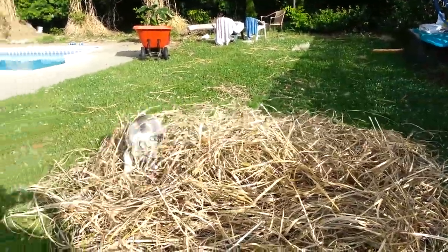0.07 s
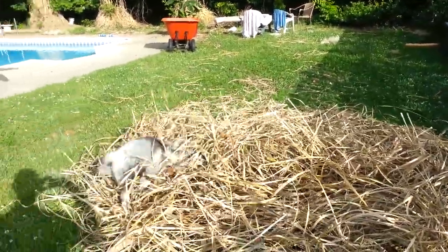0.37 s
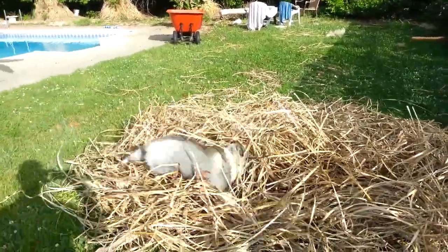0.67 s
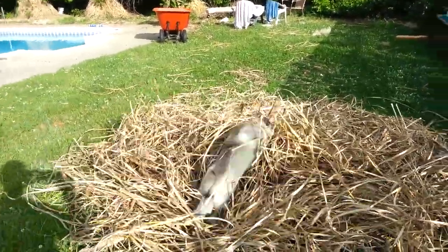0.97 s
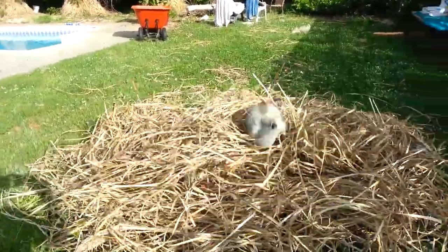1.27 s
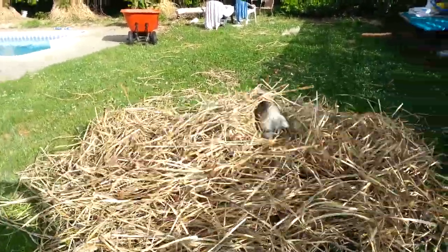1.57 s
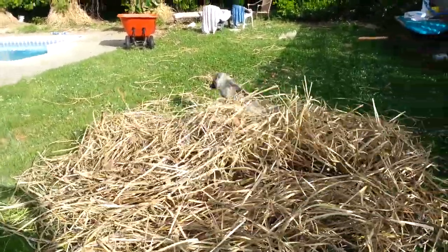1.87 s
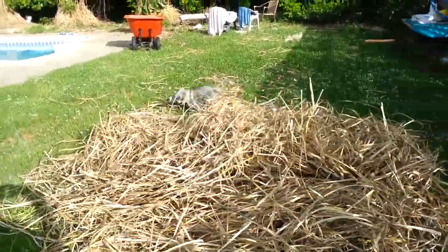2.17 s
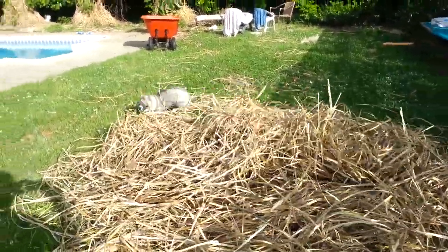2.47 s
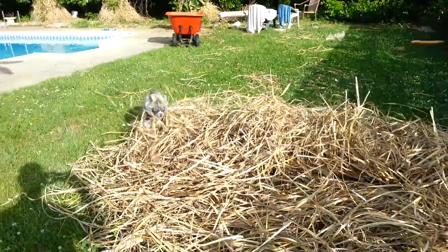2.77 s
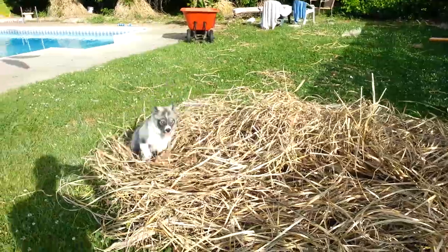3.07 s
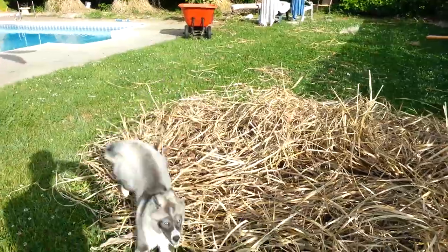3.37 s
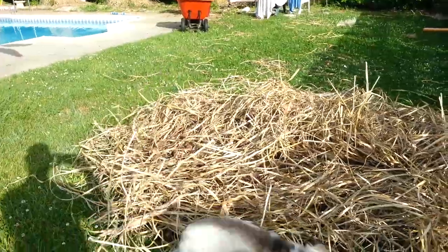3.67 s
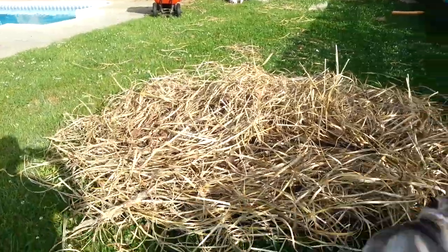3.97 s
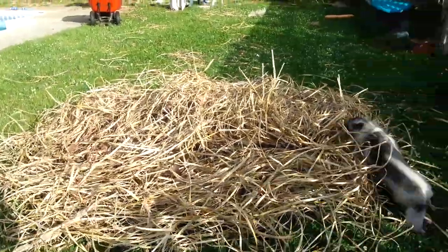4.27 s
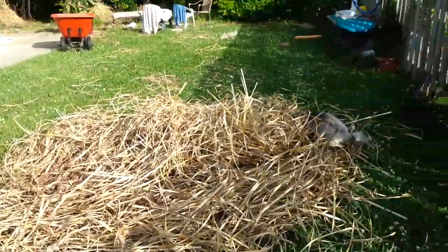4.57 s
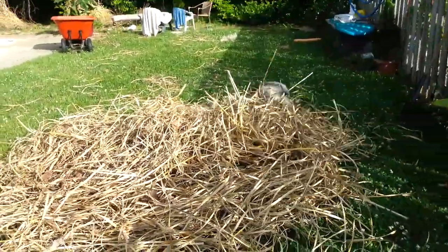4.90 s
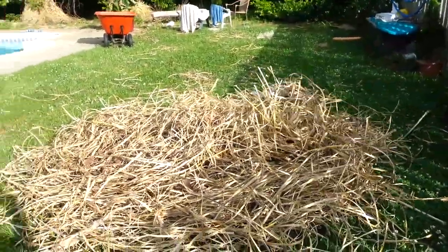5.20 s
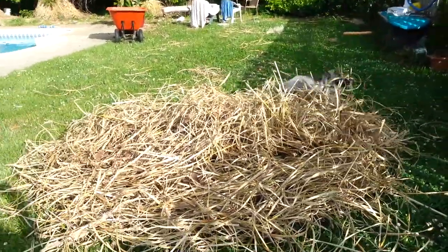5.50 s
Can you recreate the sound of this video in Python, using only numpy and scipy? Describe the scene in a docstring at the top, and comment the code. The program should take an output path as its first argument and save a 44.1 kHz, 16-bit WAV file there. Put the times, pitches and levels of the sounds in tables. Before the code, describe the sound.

A puppy races through a heap of dry straw on a lawn, one to four metres from a stereo microphone. The stalks rustle and swish in quick surges, and a few snap. The rustling turns lighter midway, with soft paw thuds and a few tiny metallic tinks as the puppy circles close, then swells again as it dives back in. A faint pump and fan hum continues underneath.

```python
"""Dry straw rustles a few metres from a stereo microphone on a lawn: a puppy bounds through the heap,
circles close past and dives in again. Stalks slide and buckle under each bound and a few snap; paws thud
softly on the turf and a small piece of metal, likely the collar tag, tinks. From across the garden
a pool pump and a fan hum throughout, over a low garden rush and a faint, straw-like high hiss."""
import sys
import numpy as np
from scipy import signal
from scipy.fft import rfft, irfft, next_fast_len
from scipy.io import wavfile
from scipy.ndimage import uniform_filter1d

SR = 44100
rng = np.random.default_rng(int(sys.argv[2]) if len(sys.argv) > 2 else 0)


def file_out(sig):
    """Save sig as 16-bit WAV at sys.argv[1]."""
    # one column per channel
    cols = np.atleast_2d(sig).T
    # limit, then scale
    lim = np.clip(cols, -1, 1)
    pcm = np.round(lim * 32767).astype(np.int16)
    wavfile.write(sys.argv[1], SR, pcm)


N = 248724
TIME = np.arange(N) / SR


def gain_of(db):
    """Decibels to amplitude."""
    return 10 ** (np.asarray(db) / 20)


def unit_rms(x):
    """Scales to rms 1."""
    return x / np.sqrt(np.mean(x ** 2) + 1e-20)


def spectrum_at(points, hz):
    """Reads a spectrum table on a log-frequency axis."""
    f, value = np.transpose(points)
    return np.interp(np.log(hz + 1), np.log(f + 1), value)


def follow(rows, t, column=1):
    """One column of a curve table at times t."""
    rows = np.array(rows)
    return np.interp(t, rows[:, 0], rows[:, column])


def add(mix, s, sound):
    """Lays a stereo sound into the mix at time s."""
    part = mix[:, max(round(s * SR), 0):][:, :sound.shape[1]]
    part += sound[:, :part.shape[1]]


def filtered(x, gain):
    """Filters by a function from Hz to gain."""
    size = next_fast_len(x.shape[-1] + 2048)
    hz = np.fft.rfftfreq(size, 1 / SR) + 1e-3
    return irfft(rfft(x, size) * gain(hz), size)[..., :x.shape[-1]]


def drift(rate_hz):
    """A slow random wander of rms 1."""
    return unit_rms(filtered(rng.standard_normal(N), lambda hz: np.exp(-(hz / rate_hz) ** 2)))


# Likeness of the sound at the two microphones: f/Hz, correlation
MIC_CORRELATION = [(100, 0.52), (500, 0.7), (1200, 0.27), (2300, 0.66), (4500, 0.25), (8000, 0.17),
                   (12000, 0.096)]

def noise_pair():
    """White noise at two microphones, partly alike in the bass and nearly unrelated in the treble."""
    mid, side = rng.standard_normal((2, N))
    mid = filtered(mid, lambda hz: np.sqrt((1 + spectrum_at(MIC_CORRELATION, hz)) / 2))
    side = filtered(side, lambda hz: np.sqrt((1 - spectrum_at(MIC_CORRELATION, hz)) / 2))
    return np.array([mid + side, mid - side])


# Bounds and steps into the straw, at their hardest push: t/s, level/dB, build-up/s, settling/s, hiss/dB
PUPPY_BOUNDS = [(.01, -32, .04, .04, 0.5), (.14, -28, 0.093, 0.21, 1), (.445, -26, 0.035, 0.055, 1),
                (.63, -30.5, 0.064, 0.053, 1), (.752, -26, 0.075, 0.038, 0), (.839, -29, 0.0043, 0.05, 0),
                (.91, -24.5, 0.095, 0.051, -2), (.955, -26, 0.018, 0.016, 0), (1.02, -30, .06, 0.14, -0.5),
                (1.21, -25, 0.094, 0.083, 0), (1.4, -27.5, 0.055, 0.03, -1), (1.485, -24, 0.095, 0.051, -3),
                (1.64, -24.5, 0.048, 0.098, -1.5), (1.82, -30.5, 0.063, 0.11, -3),
                (2.09, -30, 0.12, 0.12, -0.5), (2.27, -40, 0.025, 0.084, 3),
                (2.525, -35.5, 0.046, 0.079, 1), (2.645, -42.5, 0.022, .04, 6),
                (2.79, -34, 0.084, 0.095, 2), (2.93, -31, 0.097, 0.1, -0.5),
                (3.04, -30.5, 0.018, 0.044, 2.5), (3.095, -30.5, 0.04, 0.025, 2),
                (3.235, -32.5, 0.049, 0.069, 0.5), (3.45, -30, 0.043, 0.042, -1.5),
                (3.545, -33.5, 0.022, 0.027, -1), (3.6, -35.5, .025, 0.023, 2),
                (3.665, -33.5, 0.035, 0.049, -1.5), (3.795, -33, 0.031, 0.028, -1),
                (3.855, -32.5, 0.023, 0.013, 1), (3.905, -31.5, 0.016, 0.013, 3),
                (3.99, -36.5, 0.064, 0.045, 0), (4.073, -36, 0.0084, 0.022, -3),
                (4.155, -37.5, 0.034, 0.041, 1), (4.32, -34, 0.06, 0.044, 0), (4.4, -30.5, 0.045, 0.05, 0),
                (4.475, -29.5, 0.071, 0.069, 0.5), (4.65, -26.5, 0.081, 0.081, 0.5),
                (4.95, -30, 0.18, 0.21, 0), (5.149, -32, 0.021, 0.014, -3), (5.3, -45.5, .06, 0.056, 4),
                (5.485, -30, 0.055, 0.1, -0.5), (5.61, -29.5, 0.031, 0.043, -5)]

def bounds_db(t, with_hiss=False, creep_db=-52):
    """Each bound builds to its hardest push, then the straw settles, never quite coming to rest."""
    build_shape, settle_shape = 1.27, 1.36  # 1 = pointed, 2 = rounded
    power = gain_of(creep_db) ** 2
    for s, db, build_s, settle_s, hiss_db in PUPPY_BOUNDS:
        before = (np.maximum(s - t, 0) / build_s) ** build_shape
        after = (np.maximum(t - s, 0) / settle_s) ** settle_shape
        power = power + gain_of(db + with_hiss * hiss_db) ** 2 * np.exp(-before - after)
    return 10 * np.log10(power)


def rustle_db():
    """The rustle's level at every sample."""
    t = np.arange(0, N, 64) / SR
    return np.interp(TIME, t, bounds_db(t))


def crackle(per_s, spread_db, cycles, low_hz, high_hz, count):
    """Stalks buckle in tiny ticks; each stalk has its own pitch and place."""
    t, out = np.arange(512) / SR, np.zeros((2, N))
    for hz in np.geomspace(low_hz, high_hz, count):
        size = gain_of(spread_db * np.minimum(rng.exponential(1, N), 4)) * rng.choice([-1, 1], N)
        impulses = size * (rng.random(N) < per_s / count / SR)
        tick = np.sin(2 * np.pi * hz * t) * np.exp(-hz * t / cycles) * hz
        sound = signal.oaconvolve(impulses, tick)[:N]
        lag = rng.integers(-1, 2)
        out += [np.roll(sound, lag), np.roll(sound, -lag)]
    return unit_rms(out)


# Straw underfoot: t/s, share of loose straw by the microphone, share of right flank (the rest is mid-heap)
STRAW_SHARES = [(0, 0.04, 0.3), (2.4, 0.04, 0.17), (3.3, 0.16, 0.43), (3.42, 0.4, 0.2), (3.92, 0.83, 0),
                (4.03, 0.7, 0.5), (4.6, 0.1, 0.47), (5.2, 0, 0.63), (5.64, 0.11, 0.7)]

def stalk_contact(clump_db=0.55):
    """Stalks slide and buckle, thick hollow ones knock, and crisp ticks stand out near the microphone."""
    ticks = crackle(per_s=6000, spread_db=3, cycles=1.6, low_hz=2200, high_hz=13500, count=36)
    knocks = crackle(per_s=900, spread_db=1.5, cycles=6, low_hz=3000, high_hz=7000, count=24)
    crisp = crackle(per_s=900, spread_db=2.2, cycles=9, low_hz=8000, high_hz=12800, count=12)
    loose = follow(STRAW_SHARES, TIME)
    crackling = gain_of(-6) * ticks + gain_of(-14) * knocks + gain_of(-7) * loose * crisp
    return (noise_pair() + crackling) * gain_of(clump_db * drift(28))


# Rustle from mid-heap, from loose straw by the microphone and from the right flank: f/Hz, level/dB
HEAP_SPECTRUM = [(300, -26), (420, -14), (540, -9.5), (700, -7.5), (950, -8), (1350, -5.5), (1700, -4.5),
                 (2050, -3), (2450, -3), (2800, -6), (3200, -6), (3800, -1.8), (5300, 1), (6400, -3.5),
                 (7100, -2.5), (7700, -5.5), (8500, -4.5), (10500, -7.5), (12500, -6.5), (14500, -11)]
LOOSE_SPECTRUM = [(250, -25), (450, -16), (750, -5), (1180, -7), (1550, -4.5), (2300, -6.5), (3200, -4.5),
                  (4700, -1), (6500, -4), (7600, -3.5), (8800, -7), (10300, -3.5), (11900, -6), (13000, -8),
                  (14500, -10.5)]
FLANK_SPECTRUM = [(300, -28), (420, -17), (540, -7.5), (680, 0), (880, -7.5), (1150, 1.5), (1600, -4.5),
                  (2200, -3.5), (3000, -0.5), (4800, -2), (6800, -6), (8600, -0.5), (11000, -6.5),
                  (14500, -10)]
# Rings of the stalks and the heap's hollows: t/s, papery f/Hz, level/dB, hollow f/Hz, level/dB
STRAW_RINGS = [(0, 4400, 0.5, 2300, 0), (.45, 4620, 0, 2240, 1), (.92, 5700, 2, 2200, 3),
               (1.2, 5130, 1, 2150, 2.5), (1.47, 5130, 2, 2000, 4.5), (2.2, 4770, 3, 2450, -1),
               (2.6, 4370, 2.5, 2400, -1), (2.9, 4100, 0.5, 2020, 2.5), (3.25, 4500, 0.5, 2050, 3),
               (3.6, 5240, 1, 2200, 4), (4.1, 3900, 0.5, 2300, 0.5), (4.6, 5000, 0, 2080, -1.5),
               (5.05, 4830, 3.5, 1930, 2.5), (5.64, 5100, 0.5, 2200, 2.5)]

def straw_colour_db(hz, t, papery_width_hz=620, hollow_width_hz=160, patchy_db=1.1):
    """The colour shifts in patches and two rings move as the puppy meets other bundles of stalks."""
    loose, flank = follow(STRAW_SHARES, t), follow(STRAW_SHARES, t, column=2)
    places = [(HEAP_SPECTRUM, 1 - loose - flank), (LOOSE_SPECTRUM, loose), (FLANK_SPECTRUM, flank)]
    colour_db = sum(np.outer(spectrum_at(place, hz), share) for place, share in places)
    for column, width_hz in [(1, papery_width_hz), (3, hollow_width_hz)]:
        detuning = (hz[:, None] - follow(STRAW_RINGS, t, column)) / width_hz
        colour_db += follow(STRAW_RINGS, t, column + 1) / (1 + detuning ** 2)
    patches = uniform_filter1d(rng.standard_normal(colour_db.shape), size=4, axis=0)
    patches = unit_rms(uniform_filter1d(patches, size=30, axis=1))
    return colour_db + patchy_db * patches * (hz / (hz + 600))[:, None]


# Two early reflections close to the microphone: t/s, a silent delay/ms, then delay/ms of each of the two
REFLECTION_DELAYS = [(0, .91, 1.54, 1.94), (.68, .9, 1.5, 1.92), (.9, .8, 1.3, 2.08),
                     (1.35, .78, 1.54, 2.08), (2.05, .88, 1.63, 2.1), (2.55, .91, 1.68, 2.03),
                     (2.8, .9, 1.65, 1.93), (3.05, .9, 1.53, 1.9), (3.28, .91, 1.52, 1.9),
                     (3.45, .9, 1.25, 1.9), (4.05, .9, 1.14, 1.8), (4.65, .9, 1.53, 1.75),
                     (4.95, .89, 1.65, 2.05), (5.4, .9, 1.75, 2.2)]

def reflections_db(hz, t, depths_db=(1.5, 0.83), scatter_hz=4470):
    """Two early reflections ripple the rustle; the ripple glides with the puppy, fading in the treble."""
    ripple = sum(db * np.cos(2 * np.pi * np.outer(hz, follow(REFLECTION_DELAYS, t, column)) / 1000)
                 for column, db in enumerate(depths_db, start=2))
    return ripple / (1 + (hz[:, None] / scatter_hz) ** 4) * (1 - follow(STRAW_SHARES, t))


# The puppy's path over the lawn: t/s, lead at the left microphone/ms, distance/m
PUPPY_PATH = [(0, -0.067, 3.5), (.45, -0.072, 3), (.7, -0.0043, 1.7), (1.15, -0.026, 1.9), (1.4, 0.032, 2),
              (2.05, 0.02, 2.7), (2.65, -0.059, 3.4), (3.25, -0.078, 2.1), (3.55, -0.074, 1.06),
              (3.82, 0.055, 0.91), (4.05, 0.14, 2.2), (4.45, 0.1, 2.3), (5.1, 0.043, 4.4),
              (5.64, 0.11, 2.5)]
# Shading by the recorder's body: f/Hz, factor on the left-right level difference
BODY_SHADOW = [(1500, -0.26), (3100, 0.15), (4400, -1.5), (5300, 0.2), (6000, 0.2), (7000, 1.76), (8300, 1),
               (10000, 0.5), (11000, 1.1), (13000, 2.5), (14200, 2)]
# Balance as the puppy passes about a metre away: f/Hz, left minus right/dB
CLOSE_BALANCE = [(60, 2.5), (130, 1.0), (290, 1.0), (640, -1), (1410, -1), (3100, 5.5), (6820, -2.5),
                 (15000, -12)]

def direction(hz, t, ahead_db=-3, db_per_ms=29):
    """Left and right gains: the body shades one microphone, and sound reaches one before the other."""
    lead_ms, loose = follow(PUPPY_PATH, t), follow(STRAW_SHARES, t)
    side_db = np.outer(spectrum_at(BODY_SHADOW, hz), (ahead_db + db_per_ms * lead_ms) * (1 - loose))
    side_db += np.outer(spectrum_at(CLOSE_BALANCE, hz), loose)
    left = gain_of(side_db / 2) * np.exp(1j * np.pi * np.outer(hz, lead_ms) / 1000)
    return np.array([left, 1 / left])


def crunch_and_hiss_db(t, stride_s=0.35, tips_lead_s=0.0042, push_share=0.3):
    """Low crunch and tip hiss against the swish: both thin with distance, and each push is brighter."""
    doublings = np.log2(follow(PUPPY_PATH, t, column=2))  # of distance, from 1 m
    stride_db = np.mean([bounds_db(t + k * stride_s / 2) for k in (-1, 0, 1)], axis=0)
    push_db = bounds_db(t + tips_lead_s) - stride_db  # tips are brushed before the weight comes down
    bright_db = push_share * push_db + bounds_db(t, with_hiss=True) - bounds_db(t)
    return -9.5 - 0.5 * doublings, 2.5 - 3 * doublings + bright_db


def rustle(crunch_hz=1700, hiss_hz=7000):
    """Under the puppy's bounds the crushed heap crunches, the stalks swish and their tips hiss."""
    hz, t, frames = signal.stft(stalk_contact(), SR, nperseg=512, noverlap=384)
    frames = frames * gain_of(straw_colour_db(hz, t) + reflections_db(hz, t)) * direction(hz, t)
    crunch = 1 / (1 + (hz / crunch_hz) ** 6)
    hiss = 1 - 1 / (1 + (hz / hiss_hz) ** 8)
    swish = 1 - crunch - hiss
    crunch_db, hiss_db = crunch_and_hiss_db(t)
    # each band is evened out over time, then given its own level
    power = uniform_filter1d(abs(frames.mean(0)) ** 2, size=80, axis=1)
    weight = sum(np.outer(band, gain_of(db) / np.sqrt(abs(band @ power) + 1e-20))
                 for band, db in [(crunch, crunch_db), (swish, 0), (hiss, hiss_db)])
    frames = frames * weight / np.hypot(1, gain_of(hiss_db))
    straw = signal.istft(frames, SR, nperseg=512, noverlap=384)[1][:, :N]
    return straw / straw.mean(0).std() * gain_of(rustle_db())


# Steady background, a low garden rush and a faint, straw-like high hiss: f/Hz, level/dB
BACKGROUND_SPECTRUM = [(25, -39), (50, -33), (75, -15.5), (110, 0), (150, -7.5), (200, -2.5), (260, 1.5),
                       (400, 0.5), (560, -3), (900, -13), (2000, -13), (6000, -9), (14000, -31)]
# Pump and fan tones from across the garden: f/Hz, level/dB, waver/dB
HUM_TONES = [(120.1, -54.5, 1.5), (178.6, -69, 6.5), (239.6, -58.5, 4), (292.2, -46.5, 1.5),
             (352.7, -68.5, 5.5), (584.5, -56, 0)]
# Swell of all but the deepest tone: t/s, level/dB
TONE_SWELL = [(0, -0.5), (.75, -1), (.86, 6), (1, -0.5), (1.7, 1.5), (2.1, -1), (2.31, 2), (2.6, 1),
              (4.2, 0.5), (4.9, -1), (5.64, -1.5)]

def garden(background_db=-44.5, wobble_rad=0.24, hum_trim_db=0.1, hum_sink_db=3, background_sink_db=11):
    """Pump and fan tones waver on the way over the lawn, above a low rush and a faint high hiss."""
    noise = filtered(noise_pair(), lambda hz: gain_of(spectrum_at(BACKGROUND_SPECTRUM, hz)))
    background = gain_of(background_db) * unit_rms(noise)
    hum = np.zeros((2, N))
    for hz, db, waver_db in HUM_TONES:
        phase = 2 * np.pi * hz * TIME + wobble_rad * drift(17)
        swell_db = follow(TONE_SWELL, TIME) * (hz > HUM_TONES[0][0])
        level_db = db + hum_trim_db + swell_db + waver_db * drift(14)
        hum += np.sqrt(2) * gain_of(level_db) * np.sin([phase + 0.083, phase - .25])
    # both sink while the straw is loud
    loud = np.clip((rustle_db() + 32) / 6, 0, 1)
    return background * gain_of(-background_sink_db * loud) + hum * gain_of(-hum_sink_db * loud)


# Stalks breaking under the puppy: t/s, peak level/dB, left minus right/dB, pitch factor
STALK_SNAPS = [(.8305, -7, 0, .97), (.8320, -17, 2, 1), (.8457, -12.5, -1, 1.03), (.9014, -17, 0, .96),
               (.9274, -16.5, -1, .45), (.9494, -16.5, -1.5, 1.1), (1.4307, -16, -1, .95),
               (1.785, -19, -1, 1), (2.2729, -23, -1, .88), (2.3613, -26, -1, .75), (2.4763, -24, -1, .98),
               (2.5341, -17.5, -4, 1), (2.535, -22, -5, 1.05), (2.6798, -25, -1.5, .97),
               (3.0704, -22, -2, 1), (3.1735, -21.5, 0, .85), (3.6102, -19.5, -2, .8),
               (3.6106, -21, -6, 1.9), (3.9106, -23, -3.5, 1.35), (4.0655, -19, 2, .82),
               (4.0662, -25, -1, .78), (4.0714, -25, -1, .55), (4.0771, -23.5, 1, .75),
               (4.4892, -17.5, 0, .6), (5.1612, -18, -.5, .83)]
# Modes of a breaking stalk: f/Hz, level/dB, rise/s
STALK_MODES = [(2300, -12, .00025), (4800, -3, .00016), (5600, 0, .00022), (6900, -5, .00015),
               (10200, -14, .00015), (12100, -15, .0003)]

def snaps(scatter_db=-35, scatter_s=0.018):
    """A stalk breaks: a short ring, then splinters and scatter from the heap."""
    t, out = np.arange(2000) / SR, np.zeros((2, N))
    for s, peak_db, pan_db, pitch in STALK_SNAPS:
        ring = sum(gain_of(db) * t / rise * np.exp(-t / rise) * np.sin(2 * np.pi * hz * pitch * t)
                   for hz, db, rise in STALK_MODES)
        scatter = gain_of(scatter_db) * rng.standard_normal((2, len(t))) * np.exp(-t / scatter_s)
        fracture = (t == 0) + scatter
        snap = signal.fftconvolve(fracture, ring[None], axes=1)
        mic_gains = gain_of([[peak_db + pan_db / 2], [peak_db - pan_db / 2]])
        add(out, s, mic_gains * snap / abs(snap.mean(0)).max())
    return out


# Paws landing on the lawn, 1-4 m away: t/s, thud level/dB, scuff level/dB, scuff f/Hz, scuff rise/s
PAW_LANDINGS = [(2.309, -54, -68, 597, 0.041), (3.223, -57.5, -55, 740, 0.014),
                (3.448, -68, -49, 840, 0.038), (3.495, -64, -38.5, 800, 0.01),
                (3.739, -68, -46, 780, 0.011), (3.826, -62, -44.5, 750, 0.021),
                (4.07, -60, -37, 470, 0.002), (4.13, -59, -56, 645, 0.018), (5.223, -51, -61, 596, .04)]

def paws(thud_hz=90, thud_s=0.0065):
    """Each paw gives a dull thud in the turf and a short hollow scuff."""
    t, out = np.arange(SR // 3) / SR, np.zeros((2, N))
    thud = np.sin(2 * np.pi * thud_hz * t) * t / thud_s * np.exp(1 - t / thud_s)
    for s, thud_db, scuff_db, scuff_hz, rise_s in PAW_LANDINGS:
        grit = rng.standard_normal(len(t)) + .5 * rng.standard_normal((2, len(t)))
        scuff = filtered(grit, lambda hz: 1 / (1 + (1.5 * (hz / scuff_hz - scuff_hz / hz)) ** 4))
        press = np.sqrt(t / rise_s) * np.exp(.5 - (t / rise_s) ** 2 / 2)
        add(out, s, gain_of(thud_db) * thud + gain_of(scuff_db) * unit_rms(scuff) * press)
    return out


# Tinks to the right of the microphone: t/s, upper mode level/dB, lower mode against it/dB, decay/s
TAG_TINKS = [(2.5343, -28, -9, 0.0056), (3.512, -36, -14, .009), (3.5345, -37, 4, 0.01)]

def collar_tag(low_hz=10000, high_hz=12000, pan_db=-8):
    """A small piece of metal, likely the collar tag, rings briefly in two high modes."""
    t, out = np.arange(SR // 8) / SR, np.zeros((2, N))
    for s, db, low_db, decay_s in TAG_TINKS:
        ring = gain_of(low_db) * np.sin(2 * np.pi * low_hz * t) + np.sin(2 * np.pi * high_hz * t)
        mic_gains = gain_of([[db + pan_db / 2], [db - pan_db / 2]])
        add(out, s, mic_gains * ring * np.exp(-t / decay_s))
    return out


def scene():
    """The puppy in the straw close by, the pump and fan across the garden."""
    return rustle() + snaps() + paws() + collar_tag() + garden()


def record(dry, bass_cut_hz=58, top_hz=14600):
    """The recorder's bass cut and band limit."""
    thin = filtered(dry, lambda hz: 1 / np.sqrt(1 + (bass_cut_hz / hz) ** 4))
    lowpass = signal.firwin(701, top_hz, window=("kaiser", 9), fs=SR)
    return signal.oaconvolve(thin, lowpass[None], "same")


dry = scene()
out = record(dry)
file_out(out)
```